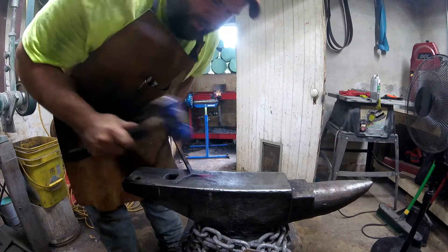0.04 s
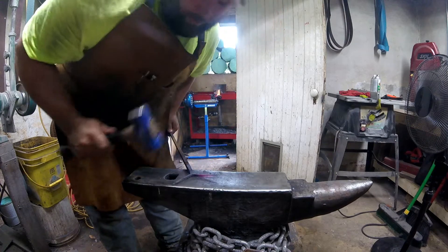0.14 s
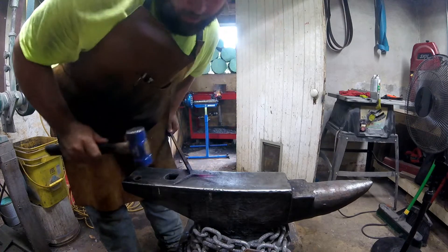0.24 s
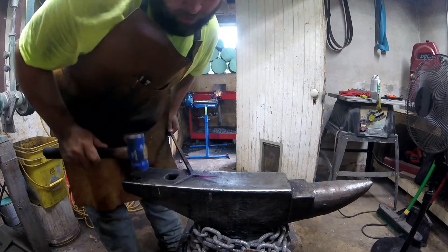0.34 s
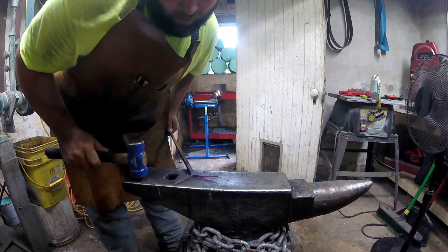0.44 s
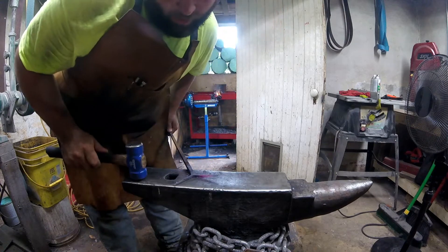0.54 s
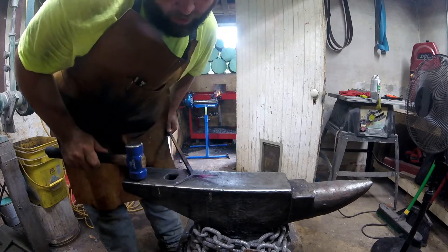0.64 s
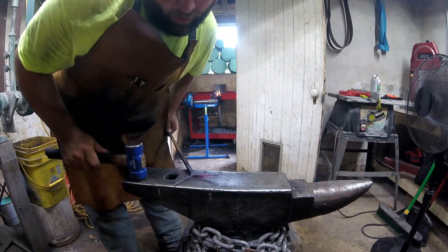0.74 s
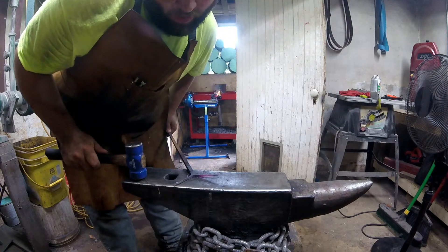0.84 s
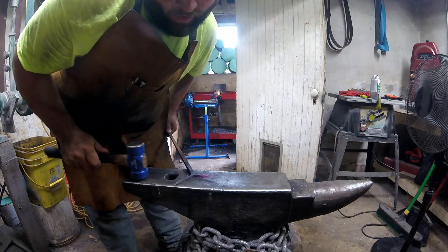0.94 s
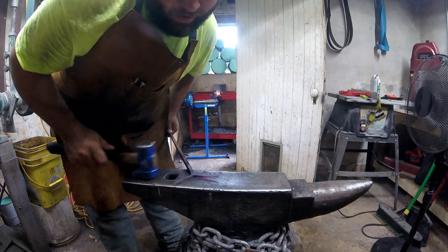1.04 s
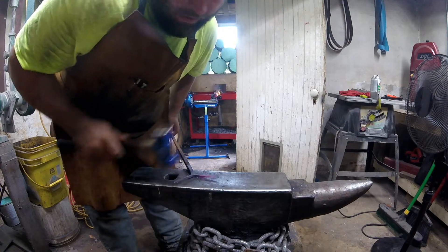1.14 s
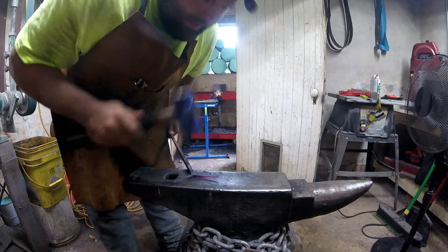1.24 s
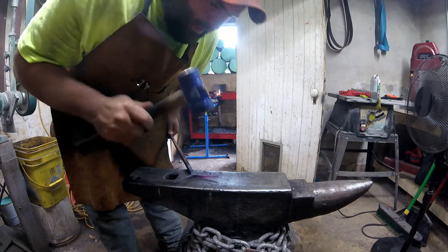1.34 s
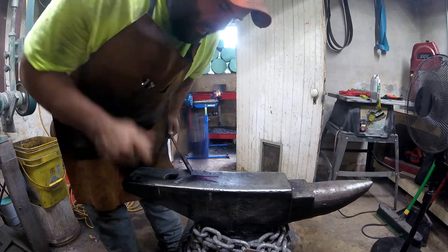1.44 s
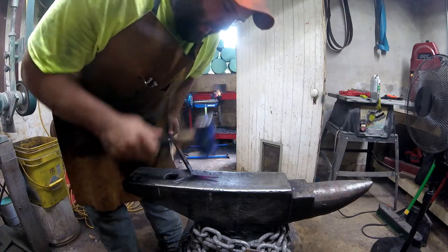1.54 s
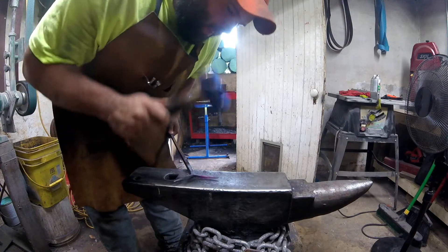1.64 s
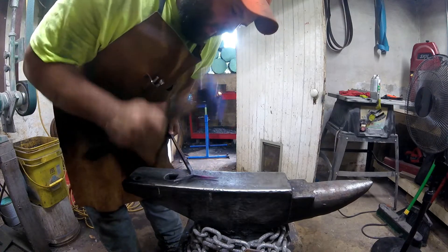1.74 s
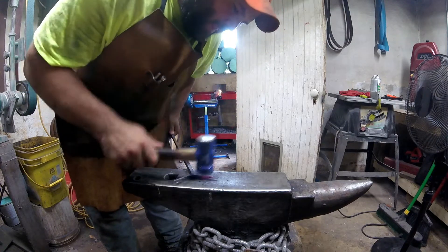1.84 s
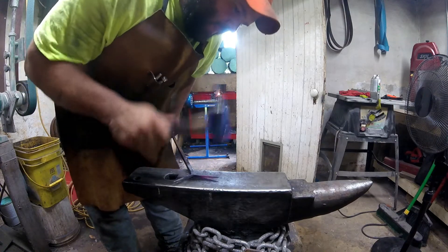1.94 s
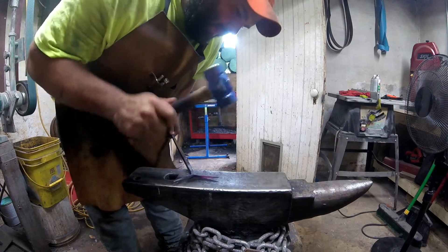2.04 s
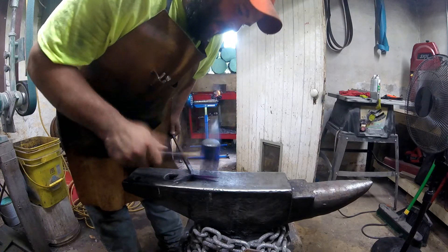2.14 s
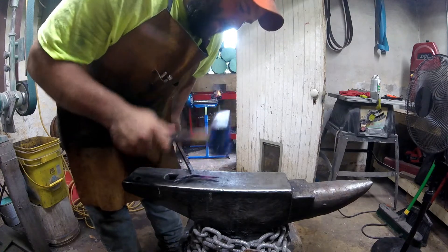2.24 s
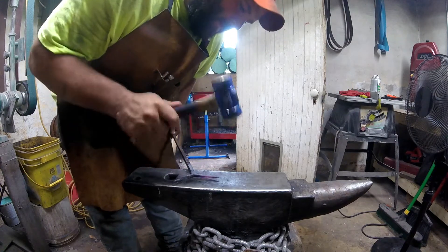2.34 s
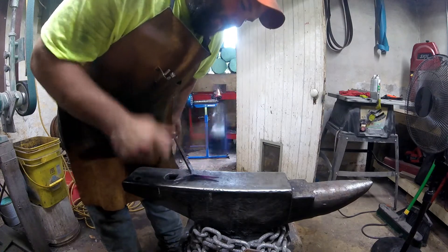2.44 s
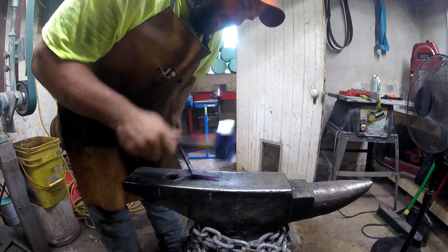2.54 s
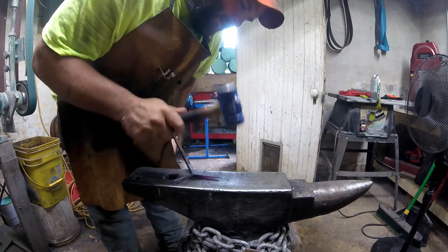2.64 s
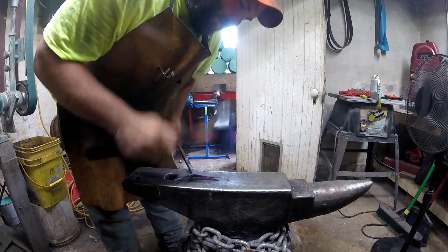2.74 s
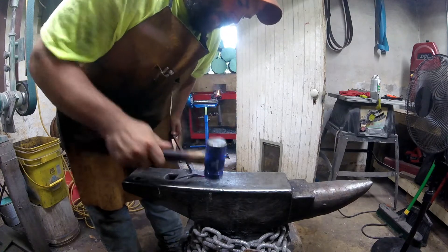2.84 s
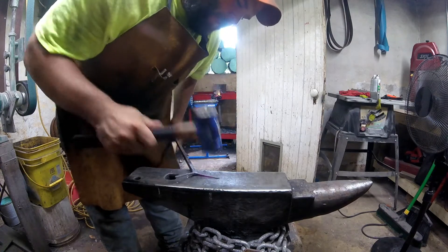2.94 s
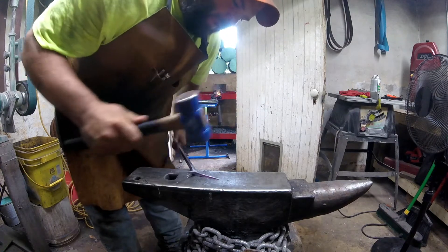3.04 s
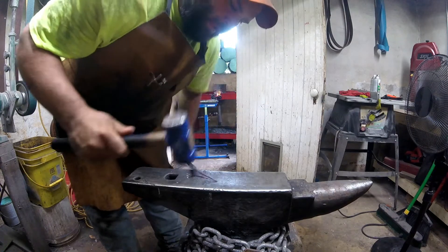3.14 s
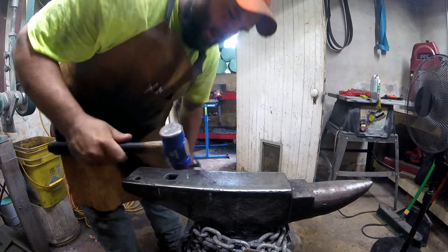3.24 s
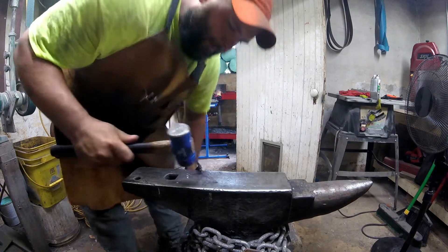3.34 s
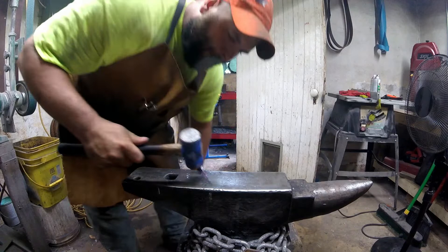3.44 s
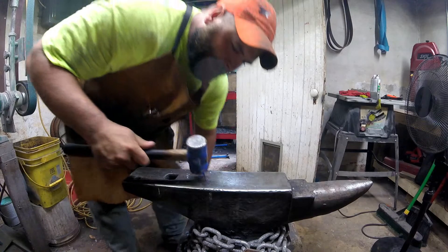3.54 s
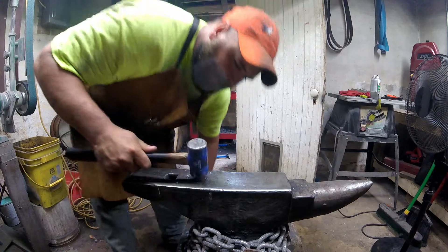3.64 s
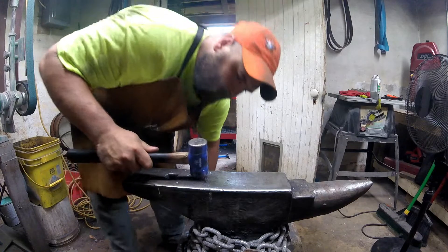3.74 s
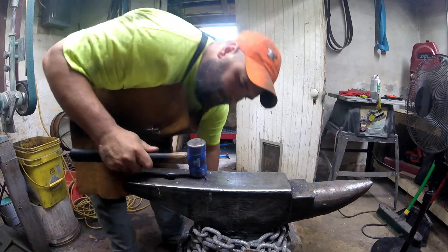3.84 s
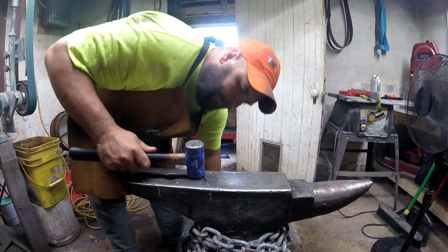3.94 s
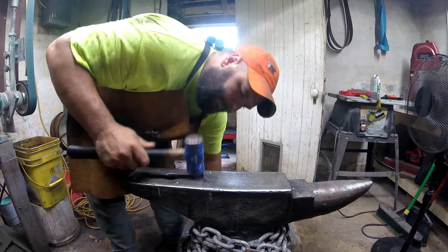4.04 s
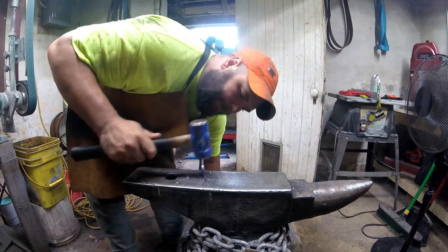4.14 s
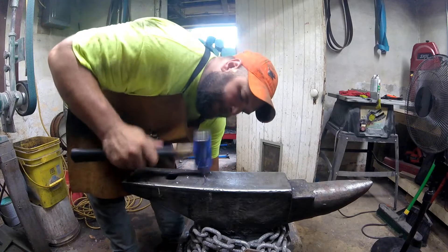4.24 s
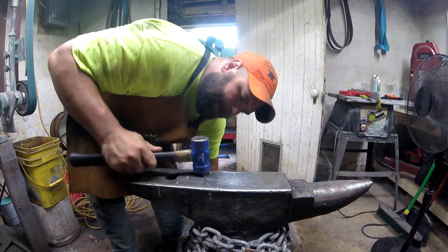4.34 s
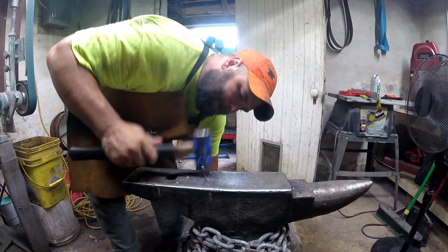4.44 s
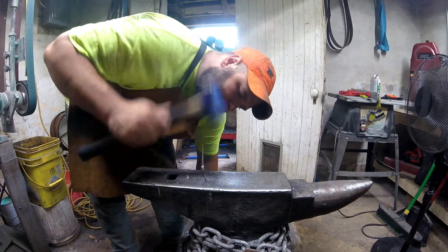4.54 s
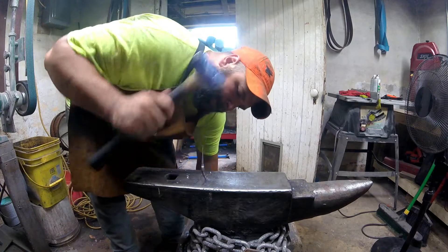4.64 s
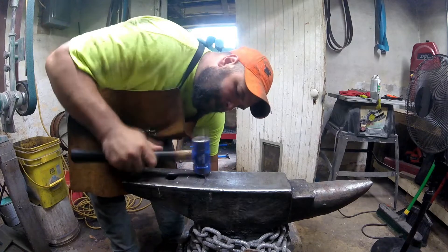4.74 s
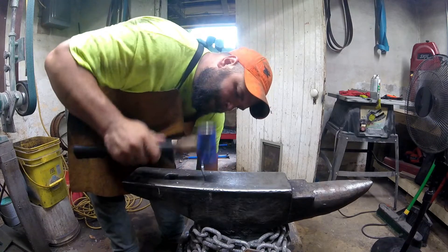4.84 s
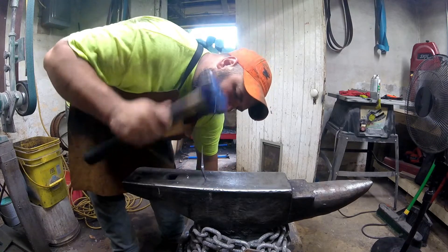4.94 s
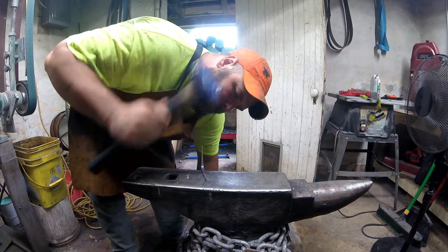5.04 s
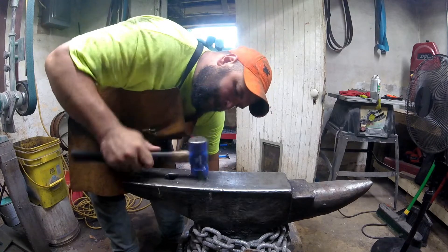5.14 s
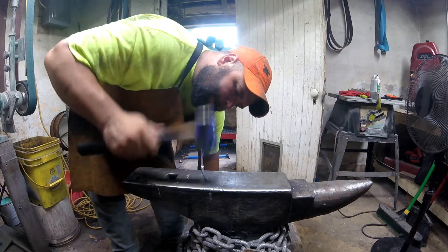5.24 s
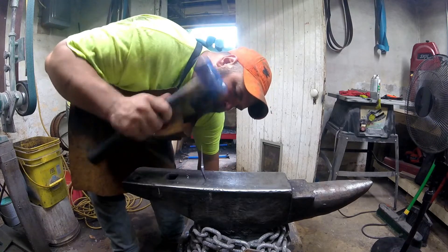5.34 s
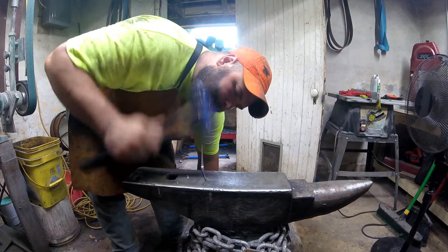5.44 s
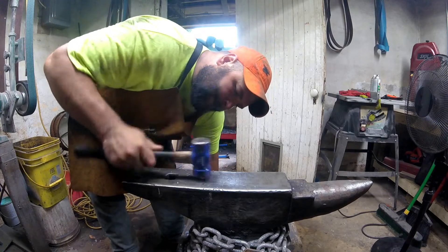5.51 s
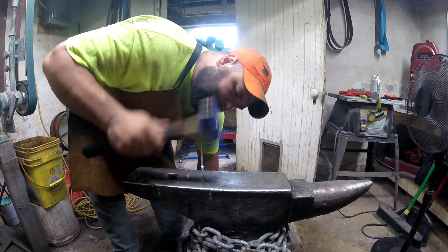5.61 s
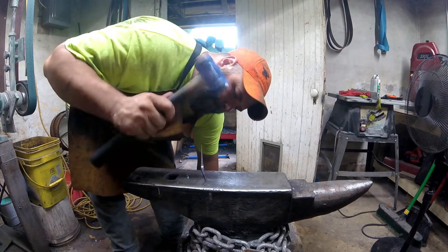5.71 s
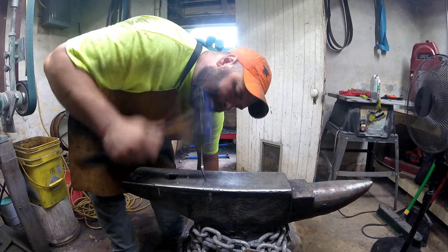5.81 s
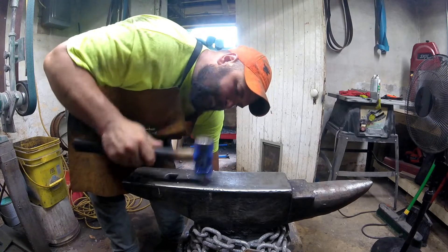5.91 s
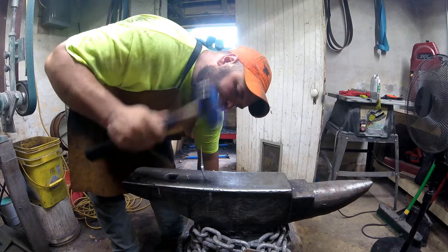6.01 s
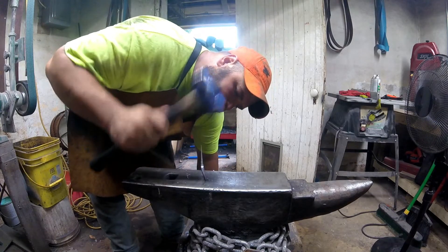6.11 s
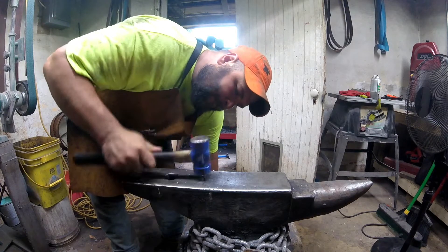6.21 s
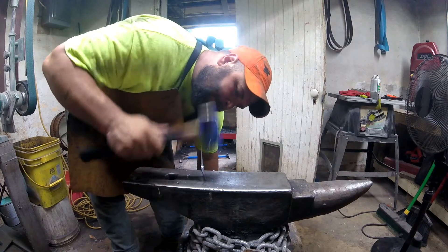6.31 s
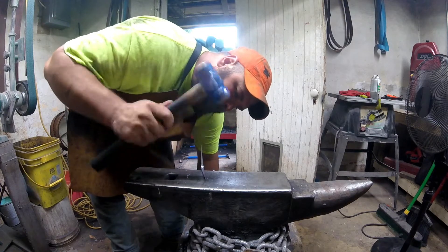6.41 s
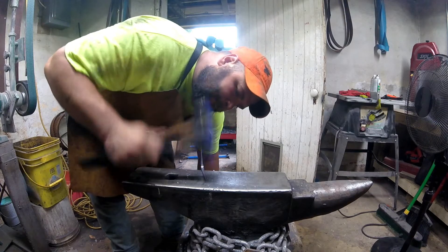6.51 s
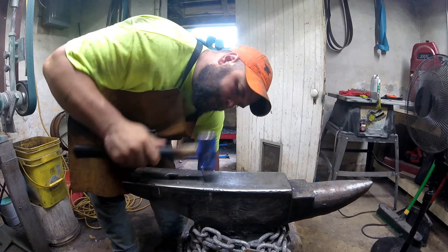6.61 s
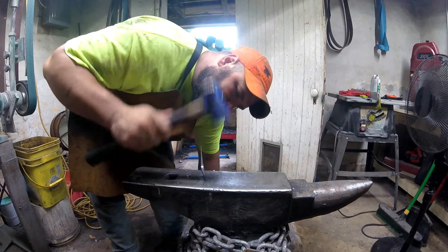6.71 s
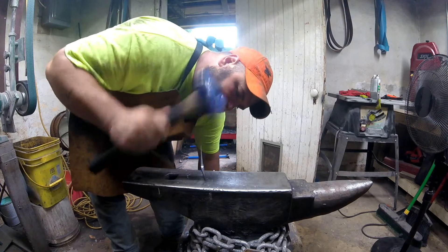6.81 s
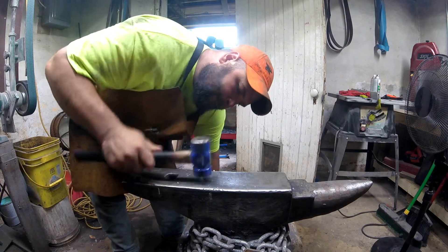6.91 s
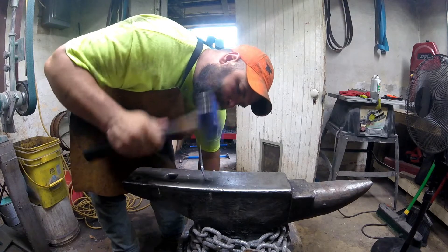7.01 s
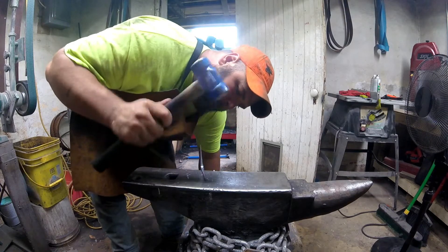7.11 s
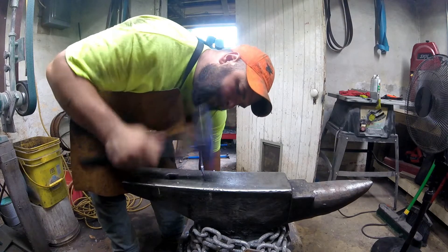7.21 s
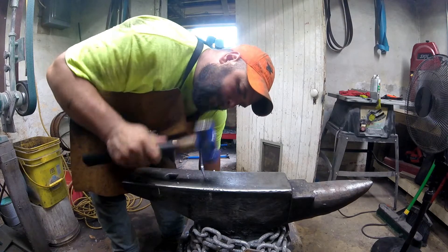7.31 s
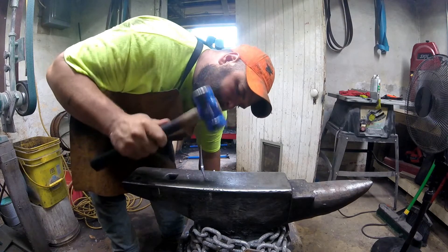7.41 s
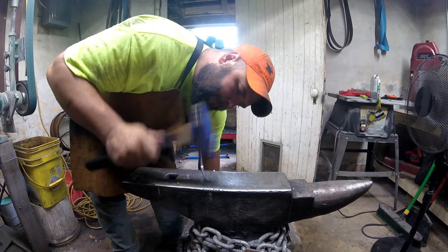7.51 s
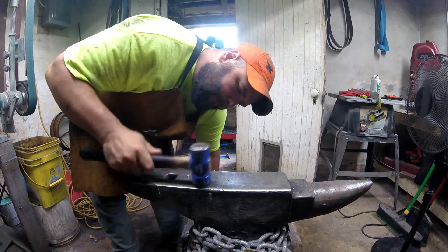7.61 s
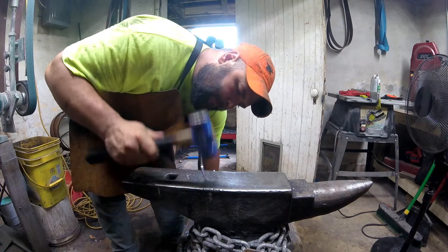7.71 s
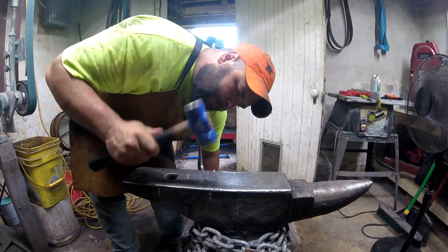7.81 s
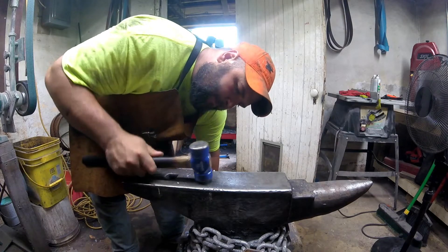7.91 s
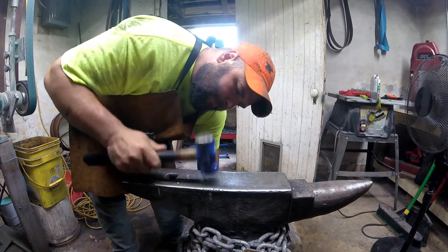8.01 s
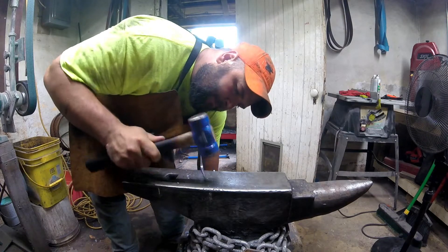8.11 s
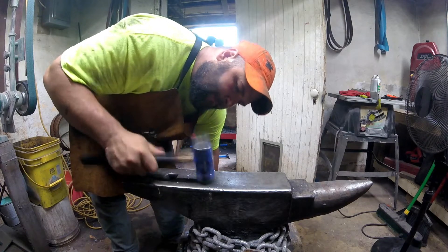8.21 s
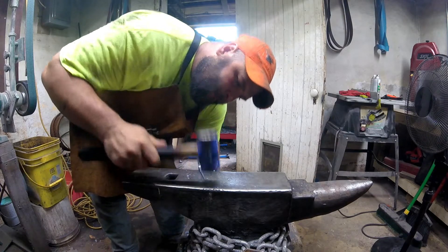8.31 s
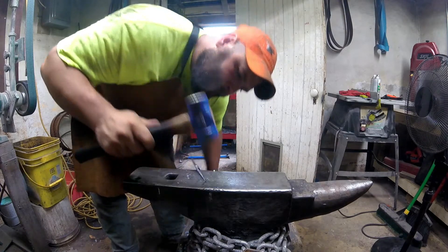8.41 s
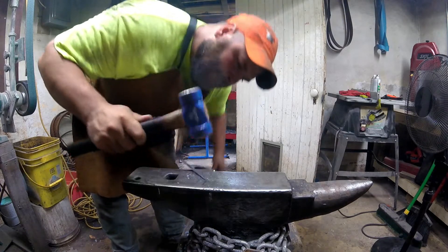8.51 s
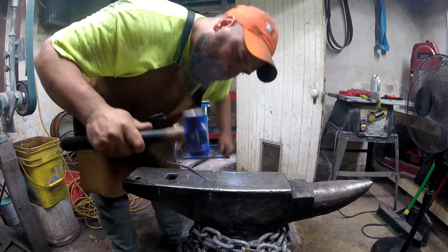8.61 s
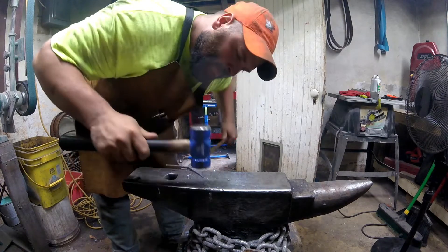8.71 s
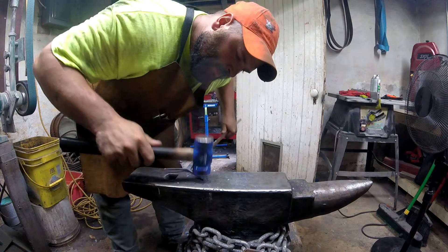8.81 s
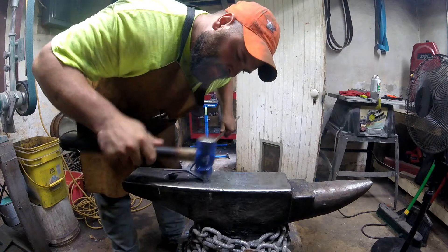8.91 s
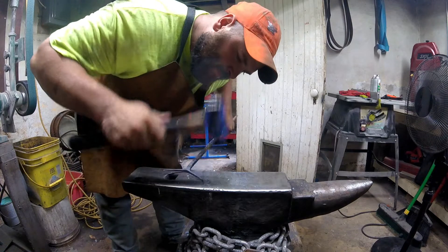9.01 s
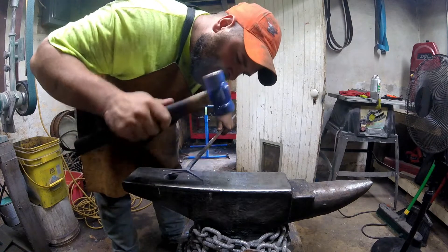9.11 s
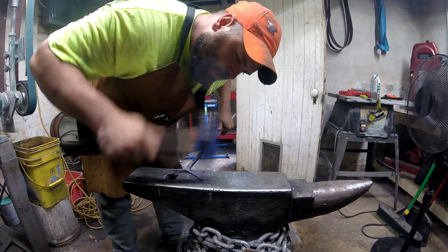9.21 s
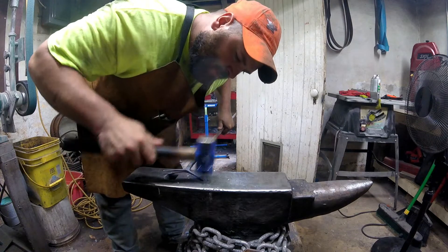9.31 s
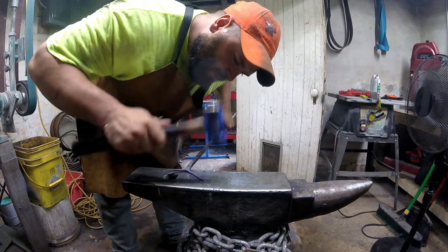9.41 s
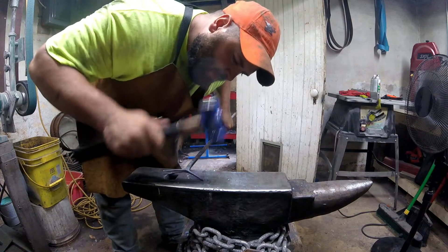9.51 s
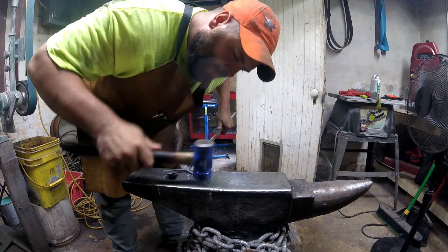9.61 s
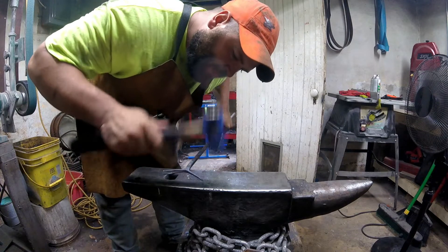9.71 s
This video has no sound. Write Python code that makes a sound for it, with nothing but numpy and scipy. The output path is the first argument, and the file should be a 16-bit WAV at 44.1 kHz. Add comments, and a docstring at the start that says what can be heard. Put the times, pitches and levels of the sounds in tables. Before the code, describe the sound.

A hand hammer strikes hot steel on an anvil in steady runs of sharp ringing clanks, with brief handling noises between, over a faint burner roar.

```python
"""In a small wooden shop, a smith's hand hammer works hot steel on a chained anvil close to the microphone.
Each blow sums a contact click, short noise, decaying modes of anvil and hammer head, and a thud of the stand.
The room blurs the ring, one long mode outlasts the blows, and light touches tick in close pairs of modes.
Between runs boots rumble, a light touch thuds, steel scrapes and something squeaks; a burner roars far off
over mains hum. A look-ahead limiter lowers the level just ahead of loud peaks."""
import sys
import numpy as np
from scipy import signal
from scipy.fft import rfft, irfft, next_fast_len
from scipy.io import wavfile
from scipy.ndimage import uniform_filter1d, minimum_filter1d, map_coordinates

SR = 44100
rng = np.random.default_rng(int(sys.argv[2]) if len(sys.argv) > 2 else 0)


def transcribe(u):
    """Save the signal u as a 16-bit wav file named by the first command-line argument.

    u: samples, shape (n,) or (channels, n), limited to [-1, 1]; the rate is SR.
    q: integer samples, one column per channel.
    """
    v = np.clip(np.atleast_2d(u).T, -1, 1)
    q = np.round(v * 32767).astype(np.int16)
    wavfile.write(sys.argv[1], SR, q)


def natural_amplitude(level_db):
    """Convert a level in decibels to a linear amplitude factor, elementwise."""
    exponent = np.asarray(level_db, float) / 20
    return 10 ** exponent


N = 430416

# bar and tongs touching the anvil lightly; long ring and tick are relative to the clatter:
# start_s, clatter_db, long_ring_db, tick_hz, tick_db
LIGHT_TOUCHES = [(3.412, -61, -12, 2490, 10), (3.66, -58, -27, 3640, 14), (4.324, -48, -25, 3520, 14),
                 (4.3309, -37.5, -14, 3850, 10)]


def unit(x):
    """Normalization: divides a signal by its root mean square."""
    return x / np.sqrt(np.mean(x ** 2) + 1e-20)


def along(points, hz):
    """Spectral interpolation: joins (hz, value) points by straight lines on a logarithmic axis."""
    f, v = np.transpose(points)
    return np.interp(np.log(hz + 1), np.log(f + 1), v)


def wobble(rate):
    """Slow random modulation: a smooth curve through random knots, rate of them a second."""
    knots = rng.standard_normal(int(N * rate / SR) + 4)
    return map_coordinates(knots, [np.arange(N) * rate / SR])


def noise(spectrum):
    """Spectral shaping: white noise weighted in frequency makes steady noise of rms 1."""
    m = next_fast_len(N)
    weight = natural_amplitude(along(spectrum, np.fft.rfftfreq(m, 1 / SR)))
    return unit(irfft(rfft(rng.standard_normal(m)) * weight, m)[:N])


def dying(spectrum, size):
    """Reverberant decay: a second of noise, each frequency dying at the room's rate; rms 1 over 50 ms."""
    # decay time of the shop: frequency_hz, t60_s
    room_decay = [(60, 0.75), (160, 0.29), (420, 0.31), (1100, .31), (2900, 0.27), (7700, 0.19),
                  (15000, 0.22)]
    hz, t, z = signal.stft(rng.standard_normal(SR), SR, nperseg=size)
    start_db = along(spectrum, hz)[:, None]
    fall_db = 60 * t / along(room_decay, hz)[:, None]
    tail = signal.istft(z * natural_amplitude(start_db - fall_db), SR, nperseg=size)[1][:SR]
    return tail / np.std(tail[:SR // 20])


def ringing(hz, t60, t):
    """Modal decay: one exponentially dying sine per mode."""
    return natural_amplitude(-60 * t / t60[:, None]) * np.sin(2 * np.pi * hz[:, None] * t)


def contacts():
    """Excitation: every contact in time order as start_s and clatter, thud, horn, waist, long ring, treble in dB.

    All levels after the clatter are relative to it."""
    # forging blows on the hot bar: start_s, clatter_db, thud_db, waist_ring_db, long_ring_db
    blows = [(-0.14, -15.5, -4, -1, -16.5), (1.8782, -18.5, 2.5, 7, -5), (2.2168, -23.5, 2, 6.5, -12.5),
             (2.5343, -25, -1, 5, -18), (2.8469, -18, -1, 5.5, -17), (4.8067, -18.5, 3.5, 6, -8),
             (5.1871, -15.5, 0.5, 12.5, 4), (5.5472, -20, 2.5, 5, -7), (5.905, -22.5, 2.5, 3, -16),
             (6.2545, -22.5, 0, 10, -4.5), (6.6028, -27, 2.5, 4.5, -21), (6.9511, -27.5, 0.5, 11, -11),
             (7.3004, -25.5, -2, 12, -4.5), (7.6239, -43, 13, 8.5, -7), (7.972, -30, 4, -8, -15),
             (8.2887, -29, 6, -9, -27), (8.913, -37, 5, -14, -17.5), (9.31, -25.5, 5.5, 2.5, -8),
             (9.649, -21.5, 3.5, 6.5, -15)]
    # glancing blows that skid and shake the chain: start_s, clatter_db, thud_db, waist_ring_db, long_ring_db
    skids = [(1.5305, -22.5, 3, 1.5, -10.5)]
    # the hammer dropping on the bare anvil and bouncing: start_s, clatter_db, waist_ring_db, long_ring_db
    bounces = [(0.4712, -27.5, 11, 6), (0.551, -35, 11, -1), (0.58, -42, -3, 6)]
    face_horn_db = -9.5  # a blow on the face hardly moves the horn
    # treble of a forging blow grows with its long ring
    rows = [(s, db, thud, face_horn_db, waist, long, -9 + .18 * long) for s, db, thud, waist, long in blows]
    rows += [(s, db, thud, face_horn_db, waist, long, -0.5) for s, db, thud, waist, long in skids]
    rows += [(s, db, -1, 20.5, waist, long, -13) for s, db, waist, long in bounces]
    rows += [(s, db, -2, -20, -1, long, -3) for s, db, long, *_ in LIGHT_TOUCHES]
    return sorted(rows)


def anvil_ring(db, thud_db, horn_db, waist_db, t):
    """Modal excitation: where a blow lands decides which part of the anvil rings."""
    # modes of stand, anvil and hammer head: frequency_hz
    mode_hz = np.array([183, 300, 420, 835, 1110, 1567, 1800, 1826, 2690, 3272, 3383, 3410, 3600, 3822,
                        3910, 4708, 4978, 5640, 5806, 6600, 7305, 7720, 7930, 8320, 9362, 9545, 10270,
                        11500, 13910, 15480, 15710])
    # strength and decay of each of these modes: level_db, t60_s
    mode_db, t60 = np.transpose([(-1.5, .19), (-13, .14), (-2, 0.16), (-12, .1), (-16, .1), (3, .15),
                                 (5, .175), (2.5, .19), (-10, .07), (-1, .12), (3, .12), (-2, .16),
                                 (-1, .1), (2, .14), (-3, .09), (2, .17), (6.5, .18), (2.5, .25), (2, .32),
                                 (8, .13), (0, .13), (-10.5, .14), (-14, .38), (-8, .09), (-11, .13),
                                 (-15, .14), (-44, .17), (-26, .3), (-40, .17), (-14, .12), (-25, .27)])
    # where stand, horn, waist and high modes meet: frequency_hz
    part_edges = [1400, 2200, 4000]
    # high modes that belong to the horn: frequency_hz
    horn_overtones = [10270, 13910]
    # random change of stand, horn, waist and high modes from blow to blow: deviation_db
    scatter = np.array([2, 1.5, 2.5, 3])
    part = np.where(np.isin(mode_hz, horn_overtones), 1, np.digitize(mode_hz, part_edges))
    chance_db = scatter[part] * rng.standard_normal(len(mode_hz))
    soft_db = 0.8 * min(db + 30.5, 0)  # a light touch is soft and hardly wakes the high modes
    high_db = -14 + .4 * waist_db + soft_db  # the high modes follow the waist
    part_db = np.array([thud_db, horn_db, waist_db + soft_db / 2, high_db])
    modes = ringing(mode_hz, t60, t) * (1 - np.exp(-t / 0.0006))
    return natural_amplitude(mode_db + part_db[part] + chance_db) @ modes


def head_ring(treble_db, t):
    """Modal excitation: the hammer head answers in short high modes that follow the treble."""
    # short modes of the hammer head: frequency_hz, level_db, t60_s
    hz, mode_db, t60 = np.transpose([(8200, -6, .12), (8740, -16, .2), (9030, -12, .13), (9125, -18, .13),
                                     (10130, -18, .16), (10550, -18, .12), (10765, -22, .2),
                                     (11070, -16, .12), (11370, -24, .25), (11710, -25, .25),
                                     (11990, -26, .35), (12475, -19, .18), (14670, -26, .15),
                                     (14910, -24, .15)])
    chance_db = 4 * rng.standard_normal(len(hz))
    modes = ringing(hz, t60, t) * (1 - np.exp(-t / 0.0004))
    return natural_amplitude(mode_db - 7 + treble_db + chance_db) @ modes


def in_room(ring):
    """Convolution: dense reflections blur the ring into beats, heard beside the direct sound."""
    echo = dying([(100, 0), (10000, 0)], size=256)[:SR // 2]
    walls = signal.fftconvolve(ring, echo / np.linalg.norm(echo))[:SR]
    return natural_amplitude(-2) * ring + natural_amplitude(-4.5) * walls


def contact_noise(treble_db, t):
    """Broadband impact: rough contact sheds short noise, and scale and chain add a treble sizzle."""
    # short noise of the contact: frequency_hz, density_db
    clatter = [(400, -10), (800, -6.5), (1500, 0), (2600, -0.5), (4200, -2), (4700, -14), (6000, -57.5),
               (9000, -60)]
    # scale and chain: frequency_hz, density_db
    sizzle = [(3500, -17), (4800, -3), (6500, 5), (7500, -6.5), (9000, -16), (11500, -28), (14000, -36),
              (15600, -37), (16500, -64.5)]
    burst = dying(clatter, size=256) + dying(sizzle, size=256) * natural_amplitude(treble_db)
    return burst * (1 - np.exp(-t / .0006))


def stand_thud(thud_db, t):
    """Inertia: the heavy stand and floor boards are slow to move, then die as low noise."""
    # thud of stand and floor boards: frequency_hz, density_db
    boards = [(20, -26), (33, -2.5), (50, -13), (68, 4), (110, -16.5), (180, -10.5), (300, -10.5),
              (420, -5.5), (620, -11.5), (900, -9), (1400, -32.5), (2600, -83.5)]
    return natural_amplitude(thud_db - 3) * dying(boards, size=1024) * (1 - np.exp(-t / 0.0035))


def contact_click(treble_db, t):
    """Impulse: the faces meet for a fraction of a millisecond; a skidding blow clicks less."""
    u = (t - .0006) / .00011  # centre and width in s
    click_db = 25 - 1.3 * max(treble_db + 9, 0)
    return natural_amplitude(click_db) * (u * u - 1) * np.exp(-u * u / 2)


def hammer():
    """Superposition: each contact adds ring, noise, thud and click; room and stand answer anew each time."""
    out, t = np.zeros(N + 2 * SR), np.arange(SR) / SR
    fade = np.clip((1 - t) / .3, 0, 1)
    for s, db, thud_db, horn_db, waist_db, _, treble_db in contacts():
        ring = anvil_ring(db, thud_db, horn_db, waist_db, t) + head_ring(treble_db, t)
        blow = in_room(ring) + contact_noise(treble_db, t)
        blow += stand_thud(thud_db, t) + contact_click(treble_db, t)
        # a second of lead-in holds the blow that starts before time zero
        out[round((s + 1) * SR):][:SR] += natural_amplitude(db) * fade * blow
    return out[SR:SR + N]


def long_ring():
    """Re-excitation: one mode outlasts the beat, and each contact feeds or chokes what still rings."""
    # the long mode, a single row: frequency_hz, t60_s
    hz, t60 = (4163, .68)
    t = np.arange(N) / SR
    s, db, long_db = np.transpose(contacts())[[0, 1, 5]]
    last = np.searchsorted(s, t) - 1
    since = t - s[last]
    firm = db > -29  # light touches leave the phase alone
    phase = np.cumsum(2 * np.pi * rng.random(len(s)) * firm)
    level = natural_amplitude((db + long_db)[last] + 10.5 - 60 * since / t60 + 0.5 * wobble(25))
    level = uniform_filter1d(level, size=60)  # smooths each step to the new level
    room_fill = 1 - .5 * firm[last] * np.exp(-since / 0.019)  # the room fills with it
    return level * np.sin(2 * np.pi * hz * t + phase[last]) * room_fill


def ticks():
    """Beating: each light touch rings a close pair of short modes in bar and tongs."""
    out, t = np.zeros(N), np.arange(SR // 4) / SR
    for s, db, _, hz, tick_db in LIGHT_TOUCHES:
        pair = ringing(hz * np.array([1, .96]), np.full(2, .11), t)  # t60 in s
        pair_amp = natural_amplitude(db + tick_db) * natural_amplitude(2 * rng.standard_normal(2))
        out[round(s * SR):][:len(t)] += pair_amp @ pair
    return out


def scrape():
    """Stick-slip friction: steel dragged on the face catches unevenly, a fast random modulation of noise."""
    # level of the drag: time_s, level_db
    s, db = np.transpose([(3.68, -65), (3.742, -52), (3.752, -43.5), (3.798, -38), (3.826, -39.5),
                          (3.95, -64)])
    # its spectrum: frequency_hz, density_db
    slide = [(530, -34), (900, -7), (2050, 5), (2600, 5.5), (3380, 4.5), (4330, 3.5), (4620, -8),
             (6470, -4.5), (12000, -39.5), (15600, -74), (22000, -120)]
    drag_db = np.interp(np.arange(N) / SR, s, db, -120, -120)
    return natural_amplitude(drag_db + 1.6 * wobble(300)) * noise(slide)


def squeak():
    """Frequency modulation: a tone with a faint octave settles downward in pitch as it swells, then stops."""
    # a single row: start_s, length_s, level_db
    s, length_s, db = (4.118, .185, -39)
    from_hz, to_hz, settle_s, swell_s, stop_s = 730, 518, .035, .033, .015
    since = np.maximum(np.arange(N) / SR - s, 0)
    pitch_hz = to_hz + (from_hz - to_hz) * np.exp(-since / settle_s)
    turn = 2 * np.pi * np.cumsum(pitch_hz) / SR
    shape = (1 - np.exp(-since / swell_s)) * np.exp(-np.maximum(since - length_s, 0) / stop_s)
    return shape * natural_amplitude(db + 1.3 * wobble(60)) * (np.sin(turn) + .06 * np.sin(2 * turn))


def low_rumble():
    """Amplitude modulation: low noise rises and falls exponentially.

    Boots shift, and one light touch thuds briefly at 4.338 s."""
    # rise and fall times are for 20 dB: peak_s, level_db, rise_s, fall_s
    low_swells = [(3.7, -47, .5, 0.9), (4.338, -39.5, 0.12, 0.03), (4.65, -52, .5, 1)]
    t = np.arange(N) / SR
    swell = sum(natural_amplitude(db - 20 * np.maximum((s - t) / rise_s, (t - s) / fall_s)) for s, db, rise_s, fall_s in low_swells)
    rumble = noise([(30, -22), (100, 8), (300, 1.5), (800, -14.5), (2000, -36.5), (5000, -110)])
    return swell * natural_amplitude(1.2 * wobble(30)) * rumble


def burner():
    """Turbulence: a far flame makes a smooth roar, shaped noise that swells a little."""
    # far flame: frequency_hz, density_db
    flame = [(15, -41), (30, -6.5), (70, 6), (120, 0), (200, -6.5), (500, -8), (1000, -15), (2000, -16.5),
             (3700, -23.5), (4300, -30), (5700, -39.5), (6550, -26), (7300, -33.5), (12900, -52),
             (16000, -68), (16800, -104.5)]
    # level of the roar: time_s, level_db
    s, db = np.transpose([(0, -49), (1.2, -47), (3.201, -49), (4.501, -45), (6, -52), (8.7, -47.5),
                          (9.76, -43)])
    roar_db = np.interp(np.arange(N) / SR, s, db) + .5 * wobble(3) + .6 * wobble(14)
    return natural_amplitude(roar_db) * noise(flame)


def mains_hum():
    """Harmonic series: the mains frequency and its multiples sound as lines of unsteady level."""
    # mains lines: frequency_hz, level_db
    lines = [(60, -83), (120, -57.5), (240, -57.5)]
    t = np.arange(N) / SR
    return sum(natural_amplitude(db + 1.5 * wobble(4.2)) * np.sin(2 * np.pi * hz * t) for hz, db in lines)


def scene():
    """Superposition: the pressures of all sources add at one microphone."""
    struck = hammer() + long_ring() + ticks()
    handling = low_rumble() + scrape() + squeak()
    return (struck + handling + burner() + mains_hum())[None]


def limiter(x):
    """Dynamic range control: the gain steps down ahead of a loud peak and creeps back afterwards."""
    hop, ahead_s, ceiling_db, back_db_per_s = 64, .045, -2, 20  # hop in samples
    peak_db = 20 * np.log10(np.abs(x[0, :N // hop * hop]).reshape(-1, hop).max(1) + 1e-9)
    held = minimum_filter1d(np.minimum(ceiling_db - peak_db, 0), 2 * int(ahead_s * SR / hop) + 1)
    ramp = back_db_per_s * np.arange(len(held)) * hop / SR
    gain_db = uniform_filter1d(np.minimum.accumulate(held - ramp) + ramp, size=7)
    return x * natural_amplitude(np.interp(np.arange(N), np.arange(len(held)) * hop, gain_db))


def band_limit(x):
    """Low-pass filtering: every frequency from the 16650 Hz edge upward is removed."""
    return irfft(rfft(x) * (np.fft.rfftfreq(N, 1 / SR) < 16650), N)


def low_pass(x):
    """Removes everything above the highest recorded frequency."""
    return signal.sosfilt(signal.butter(12, 16830, fs=SR, output="sos"), x)


def record(dry):
    """Signal chain: the mix is limited, then band-limited."""
    mix = band_limit(limiter(dry))
    return low_pass(mix)


dry = scene()
out = record(dry)
transcribe(out)
```